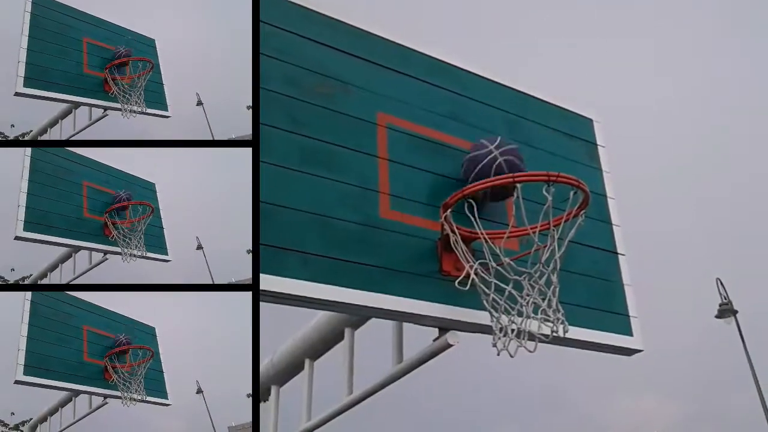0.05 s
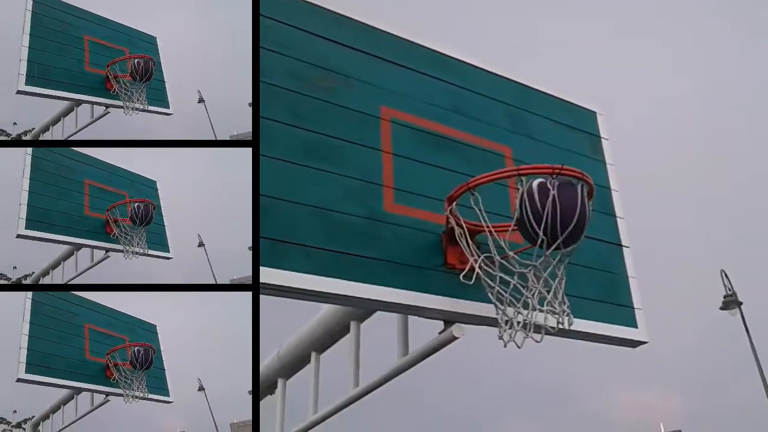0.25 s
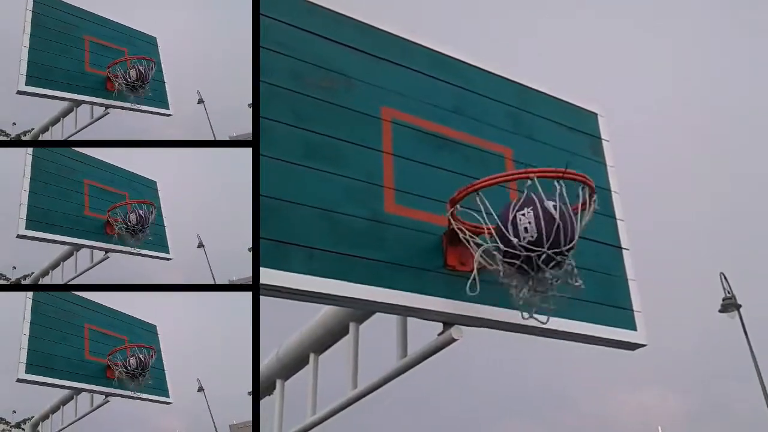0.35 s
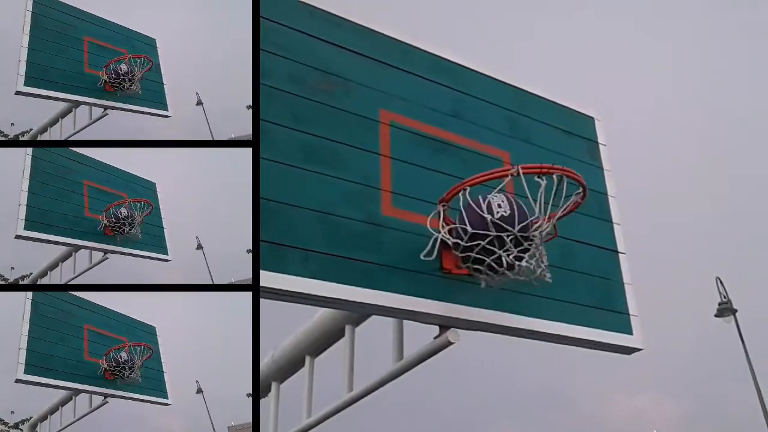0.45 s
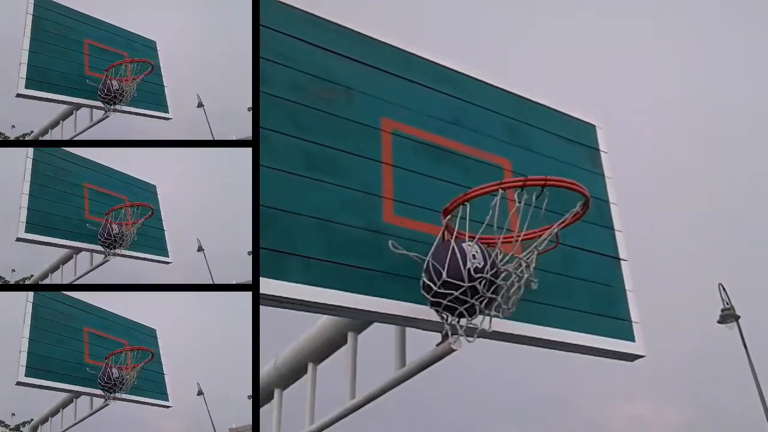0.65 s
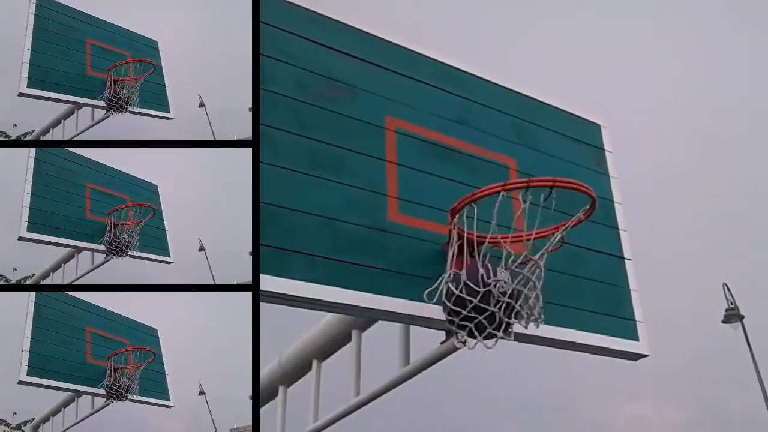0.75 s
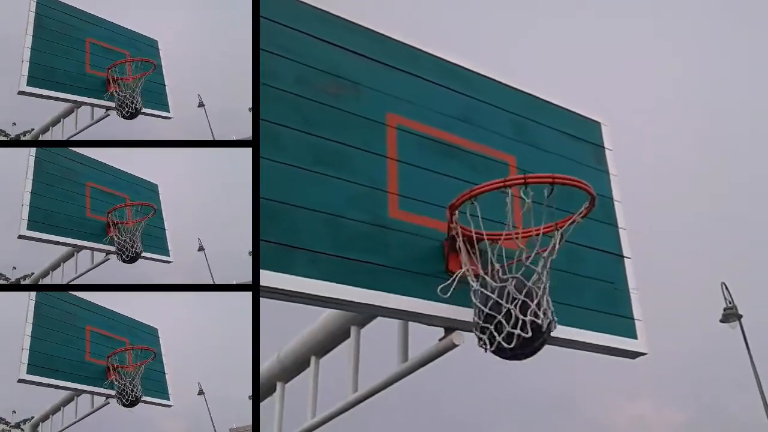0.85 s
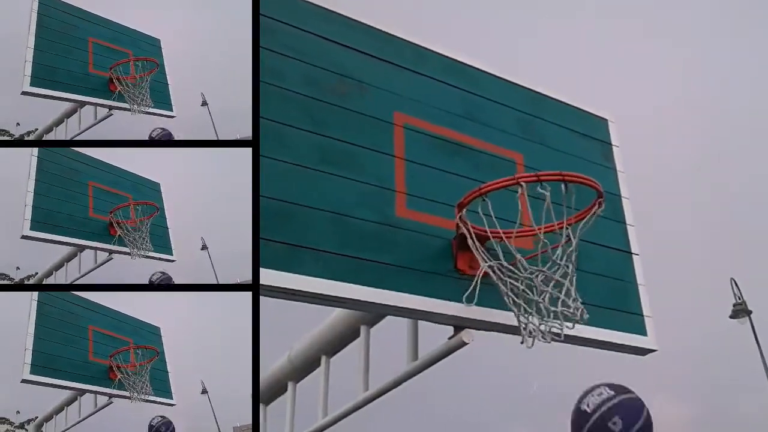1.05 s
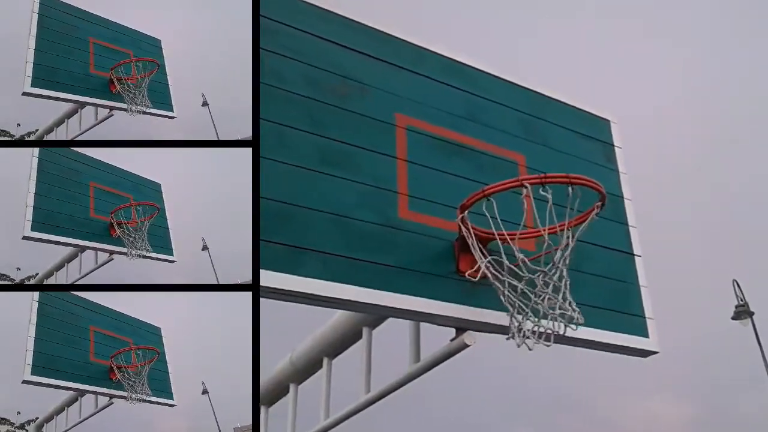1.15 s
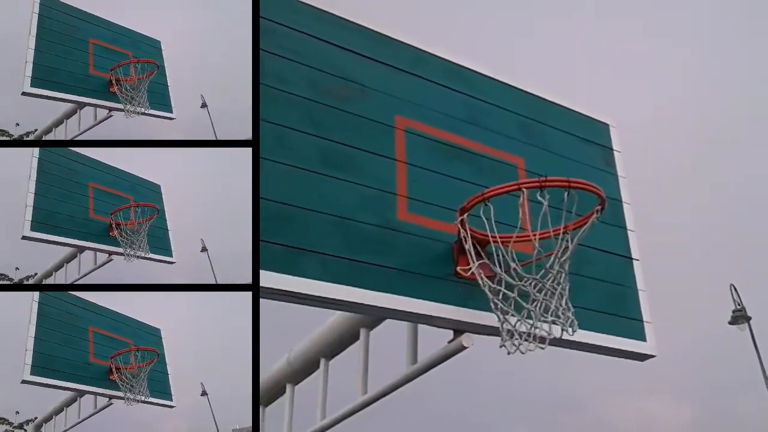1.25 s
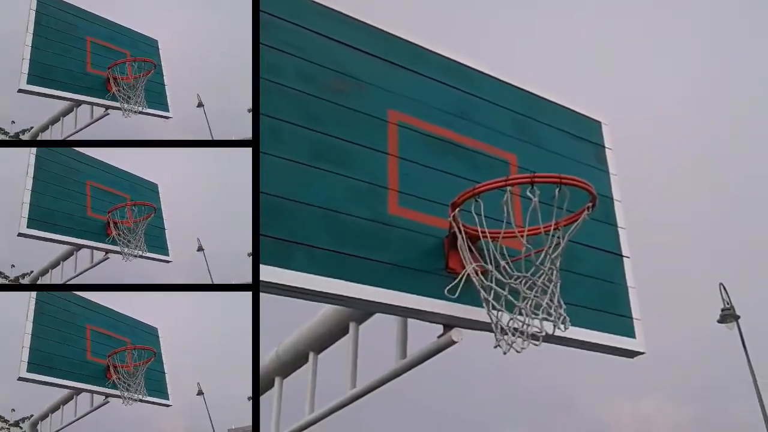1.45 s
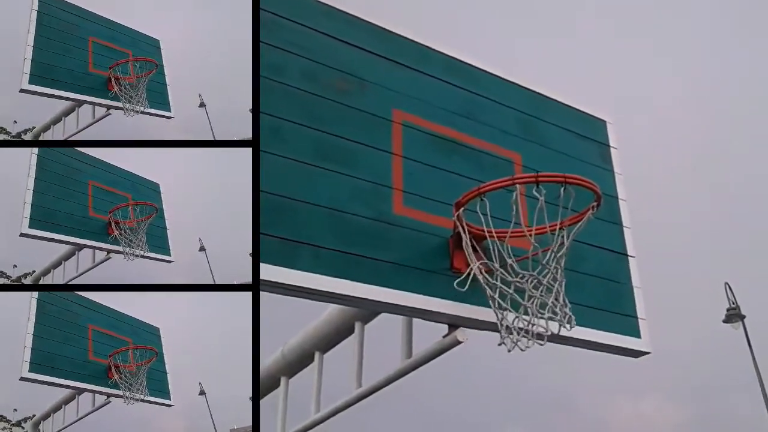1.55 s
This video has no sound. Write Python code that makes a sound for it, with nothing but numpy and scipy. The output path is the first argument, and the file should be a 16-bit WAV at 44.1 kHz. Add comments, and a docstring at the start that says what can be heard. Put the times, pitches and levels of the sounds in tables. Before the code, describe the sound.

Basketball hitting an outdoor hoop, shaking the backboard and swishing through the net with a knock.

```python
"""Basketball through an outdoor hoop

One microphone in quiet open air, with the camera's own thin hiss and buzz. The ball drops onto the rim
with a click and a thump, and the plank backboard shudders and hums. The ball brushes through the cord
net, which snaps taut with a sharp knock; the hoop squeaks as it settles, and a soft scuff follows."""
import sys
import numpy as np
from scipy import signal
from scipy.fft import rfft, irfft
from scipy.io import wavfile

SR = 44100
rng = np.random.default_rng(int(sys.argv[2]) if len(sys.argv) > 2 else 0)


def generate_wav(signal):
    """Clip the signal to [-1, 1] and save it as 16-bit WAV at the path in sys.argv[1]."""
    frames = np.transpose(np.atleast_2d(signal))
    scaled = np.clip(frames, -1, 1) * 32767
    pcm = np.round(scaled).astype(np.int16)
    wavfile.write(sys.argv[1], SR, pcm)


N = 70560  # 1.6 s


def undb(db):
    """Decibels to gain."""
    return 10 ** (np.asarray(db) / 20)


def clock():
    """Time of every sample in seconds."""
    return np.arange(N) / SR


def unit(x):
    """Scale to rms 1."""
    return x / np.sqrt(np.mean(x ** 2) + 1e-20)


def on_log(hz, points_hz, values):
    """Interpolate on a log-frequency axis."""
    return np.interp(np.log(np.maximum(hz, 1)), np.log(points_hz), values)


def colour(x, points):
    """Filter x by a curve of (f/Hz, level/dB) points, then scale to rms 1."""
    gain = undb(on_log(np.fft.rfftfreq(N, 1 / SR), *np.array(points).T))
    return unit(irfft(rfft(x) * gain, N))


def band(x, hz, width_hz):
    """Pass x through one resonance."""
    return signal.lfilter(*signal.iirpeak(hz, hz / width_hz, fs=SR), x)


def curve(points):
    """Gain along (t/s, level/dB) points."""
    return undb(np.interp(clock(), *np.array(points).T))


def swell(at, db, attack, release):
    """Smooth rise to a peak, then an exponential fall."""
    t = clock() - at
    return undb(db) * np.exp(np.where(t < 0, -(t / attack) ** 2, -t / release))


def fade(at, t60):
    """Sudden start and a 60 dB fall in t60 seconds."""
    t = clock() - at
    return (t >= 0) * np.exp(-np.log(1000) * np.maximum(t, 0) / t60)


def ring(at, modes):
    """Struck modes (f/Hz, level/dB, t60/s), each a decaying sine."""
    t = clock() - at
    return sum(undb(db) * fade(at, t60) * np.sin(2 * np.pi * hz * t) for hz, db, t60 in modes)


def dense_ring(at, table):
    """Countless close modes: quarter-octave noise bands, each with its own level and decay."""
    hz, db, t60 = np.array(table).T
    quarter = np.round(4 * np.log2(np.maximum(np.fft.rfftfreq(N, 1 / SR), 1)))
    noise, out = rfft(rng.standard_normal(N)), 0
    for k in range(22, 57):  # 45 Hz to 16 kHz
        centre = 2 ** (k / 4)
        if centre > hz[0] / 2:
            part = unit(irfft(noise * (quarter == k), N))
            out = out + part * undb(on_log(centre, hz, db)) * fade(at, on_log(centre, hz, t60))
    return out / 2  # four bands share each octave's power


def grains(per_s=4500, range_db=18):
    """Dense stick-slip clicks of uneven size."""
    fires = rng.random(N) < per_s / SR
    return fires * rng.choice([-1, 1], N) * undb(-range_db * rng.random(N))


def outdoor_air():
    """Quiet, low background noise of the place."""
    # spectrum of the air: f/Hz, relative level/dB
    spectrum = [(25, -12), (50, 5), (75, 0.5), (110, 1.5), (155, 10), (250, -3), (400, -10), (700, -14),
                (1500, -45.5), (3000, -19), (6000, -31.5), (16000, -61)]
    # its rise and fall: t/s, level/dB
    level = [(0, -61.5), (0.045, -66.5), (0.085, -68.5), (0.15, -55.5), (0.9, -53.5), (1.24, -63),
             (1.29, -62.5), (1.45, -67.5), (1.54, -61), (1.6, -66)]
    return curve(level) * colour(rng.standard_normal(N), spectrum)


def camera_hiss():
    """Thin, wavering self-noise of the camera."""
    # spectrum of the hiss: f/Hz, relative level/dB
    spectrum = [(1000, -4), (4000, -16), (7200, -9.5), (8200, 6), (9200, -2.5), (10600, -0.5),
                (12000, -16.5), (16000, -19)]
    # its rise and fall: t/s, level/dB
    level = [(0, -67), (0.045, -56.5), (0.068, -64), (0.098, -82), (0.115, -59.5), (0.88, -53.5),
             (0.92, -60.5), (1.24, -60), (1.28, -66), (1.6, -63.5)]
    return colour(rng.standard_normal(N), spectrum) * curve(level)


def camera_buzz(clock_hz=1000, stray_chance=0.31, stray_db=2, scatter_db=4.5):
    """Electrical ticks on a fast clock: two slots in five always fire, the others at random."""
    # spectrum of a tick: f/Hz, relative level/dB
    spectrum = [(1000, -36), (5000, -24), (7200, -14.5), (8300, -7), (9200, -0.5), (10400, -9.5),
                (11800, -17), (14000, -19.5), (16000, -26)]
    # rise and fall of the buzz: t/s, level/dB
    level = [(0.098, -69), (0.11, -56.5), (0.2, -51), (0.45, -48.5), (0.56, -52), (0.62, -49.5),
             (0.775, -48), (0.785, -71), (0.818, -73), (0.828, -48.5), (0.888, -48), (0.905, -96)]
    slots = np.arange(int(N / SR * clock_hz))
    steady = np.array([1, 0, 0, 0, -1])[slots % 5]
    stray = (rng.random(len(slots)) < stray_chance) * undb(stray_db)
    sizes = undb(scatter_db * rng.standard_normal(len(slots)))
    ticks = np.zeros(N)
    ticks[slots * SR // clock_hz] = np.where(steady != 0, steady, stray) * sizes
    return colour(ticks, spectrum) * curve(level)


def rim_hit(click_decay_s=0.0003):
    """The ball clicks and thumps on the rim twice in quick succession; the backboard rings on."""
    # contacts with the rim: t/s, thump gain/dB
    hits = [(0.22, -26), (0.2274, -22)]
    # click of each contact: level/dB, f/Hz
    clicks = [(-13, 7600), (-18.5, 2500)]
    # modes of ball and rim: f/Hz, relative level/dB, t60/s
    thump = [(129, -13.5, 0.17), (236, 0.5, 0.062), (480, -9.5, 0.071), (665, -14, 0.08),
             (1341.4, -14.5, 0.093)]
    # modes of backboard and frame: f/Hz, level/dB, t60/s
    board = [(74, -53, 2.0), (121.1, -35, 1.48), (143.9, -37.5, 1.9), (154.5, -45, 3.3), (178, -45.5, 0.37),
             (257.7, -39, 0.56), (393.4, -40, 0.28), (455, -50, 0.41), (840, -77, 0.59),
             (1044, -38.5, 0.27), (1090, -66, 0.29), (1295, -41.5, 0.35)]
    # dense ringing of the planks: f/Hz, level per octave/dB, t60/s
    planks = [(60.4, -64, 0.24), (119, -38.5, 0.9), (260, -37.5, 1), (540, -43.5, 1), (1080, -39.5, 0.41),
              (2260, -48, 0.29), (4700, -38.5, 0.18), (9700, -37, 0.084), (15200, -55, 0.025)]
    out, first = 0, hits[0][0]
    for (at, thump_db), (click_db, hz) in zip(hits, clicks):
        t = np.maximum(clock() - at, 0)
        click = -np.exp(-t / click_decay_s) * np.sin(2 * np.pi * hz * t)
        out = out + undb(thump_db) * ring(at, thump) + undb(click_db) * click
    return out + ring(first, board) + dense_ring(first, planks)


def hoop_squeaks(relative_width=0.06):
    """The swaying hoop squeaks and creaks in short bursts of narrow-band noise."""
    # squeaks: t/s, level/dB, attack/s, release/s, f/Hz
    squeaks = [(0.318, -61, 0.0089, 0.015, 2650), (0.33, -60.5, 0.022, 0.021, 3430),
               (0.794, -45, 0.003, 0.011, 5000), (0.85, -56.5, 0.0062, 0.027, 2670),
               (0.872, -56, 0.03, 0.018, 3330), (0.978, -58, 0.0095, 0.025, 434),
               (1.19, -66, 0.036, 0.032, 3540), (1.24, -69, 0.015, 0.026, 3460),
               (1.373, -70, 0.0045, 0.0073, 2720), (1.415, -67, 0.004, 0.0079, 2610)]
    out = 0
    for at, db, attack, release, hz in squeaks:
        width_hz = hz * relative_width
        tone = band(band(rng.standard_normal(N), hz, width_hz), hz, width_hz)
        out = out + unit(tone) * swell(at, db, attack, release)
    return out


def net_brush(board_hz=143.7, hook_hz=13796):
    """Cords slide over the ball; their pull rattles the hoop, heaves the board and rings a steel hook."""
    # cords sliding on the ball: t/s, level/dB, attack/s, release/s
    swishes = [(0.36, -43.5, 0.009, 0.014), (0.383, -31, 0.0026, 0.03), (0.396, -32.5, 0.0096, 0.021),
               (0.454, -42, 0.0085, 0.031), (0.525, -42.5, 0.0048, 0.0086), (0.6, -56.5, 0.12, 0.47),
               (0.653, -40, 0.002, 0.0082), (0.99, -55, 0.0048, 0.0063)]
    # spectrum of cord friction: f/Hz, relative level/dB
    cord = [(300, -6), (1000, -3), (2400, -17), (3700, -5.5), (5000, -5), (6200, -4.5), (7500, -7),
            (8600, -5), (10000, -13), (13000, -17.5), (16000, -28)]
    # resonances of the hoop: f/Hz, width/Hz, relative level/dB
    hoop_modes = [(207, 25, 6.5), (286, 59, 5), (414.4, 68, 8.5), (557, 80, 5), (777, 70, 7), (924, 30, 4),
                  (1047, 29, -7), (1263, 44, 0.5), (1770, 40, -41)]
    # tugs that rattle the hoop: t/s, level/dB, attack/s, release/s
    tugs = [(0.373, -39.5, 0.017, 0.021), (0.435, -38, 0.036, 0.042), (0.519, -46.5, 0.014, 0.1),
            (0.72, -50, 0.058, 0.064), (0.8, -56, 0.038, 0.033), (1.21, -70.5, 0.021, 0.01)]
    # the net's load swinging the board's main mode: t/s, level/dB, attack/s, release/s
    heaves = [(0.396, -27.5, 0.028, 0.0094), (0.467, -31.5, 0.032, 0.03), (0.598, -32, 0.0055, 0.0071),
              (0.868, -41.5, 0.021, 0.0059), (1.1, -53.5, 0.23, 0.069)]
    slide = colour(grains(), cord) * np.sqrt(sum(swell(*row) ** 2 for row in swishes))
    pull = grains()
    hoop = unit(sum(undb(db) * band(pull, hz, width) for hz, width, db in hoop_modes))
    rattle = hoop * np.sqrt(sum(swell(*row) ** 2 for row in tugs))
    heave = sum(swell(at, *shape) * np.sin(2 * np.pi * board_hz * (clock() - at)) for at, *shape in heaves)
    hook = ring(at=0.388, modes=[(hook_hz, -42.5, 0.35)])
    return slide + rattle + heave + hook


def net_snap():
    """The net snaps taut on the ball: a quick run of cracks and one ringing knock."""
    # cracks: t/s, gain/dB
    snaps = [(0.6592, 2), (0.6627, -4), (0.6665, -2)]
    # modes the snap rings: f/Hz, level/dB, t60/s
    knock = [(276, -42, 0.43), (292.8, -42.5, 0.33), (546, -43.5, 0.25), (836, -36.5, 0.12),
             (1045, -55, 0.094), (1106, -40, 0.11), (1352, -44.5, 0.075), (1440, -36, 0.12),
             (1503, -27, 0.052), (1790, -30, 0.037), (1933, -39.5, 0.12), (2675, -34, 0.083),
             (3700, -42.5, 0.12), (5340, -35, 0.02)]
    # dense ringing of one crack: f/Hz, relative level per octave/dB, t60/s
    crack = [(645, -75, 0.08), (850, -36.5, 0.17), (1570, -40.5, 0.11), (2180, -53, 0.27),
             (2860, -37.5, 0.099), (3550, -30.5, 0.055), (4080, -45, 0.083), (5230, -28, 0.054),
             (7100, -38, 0.034), (8300, -28, 0.015), (12000, -43, 0.029), (15500, -52, 0.02)]
    return ring(snaps[0][0], knock) + sum(undb(db) * dense_ring(at, crack) for at, db in snaps)


def scuff():
    """Soft stick-slip scuffing below the hoop."""
    # spectrum of the friction: f/Hz, relative level/dB
    spectrum = [(60, 13), (140, 7), (280, 6), (450, -6), (1200, -5), (2200, -2), (3200, 6.5), (4500, -6),
                (9000, 1.5), (15000, -25)]
    # scuffs: t/s, level/dB, attack/s, release/s
    scuffs = [(1.39, -67.5, 0.061, 0.096), (1.513, -53.5, 0.04, 0.02)]
    return colour(grains(), spectrum) * sum(swell(*row) for row in scuffs)


def scene():
    """Hoop, net and background at one microphone."""
    shot = rim_hit() + net_brush() + net_snap() + hoop_squeaks() + scuff()
    return (shot + outdoor_air() + camera_buzz() + camera_hiss())[None]


def record(dry):
    """The recorder cuts the bass below 69 Hz and the top above 15.9 kHz."""
    low_cut = signal.butter(4, 69, "high", fs=SR, output="sos")
    high_cut = signal.ellip(10, .2, 80, 15900, fs=SR, output="sos")
    return signal.sosfilt(high_cut, signal.sosfilt(low_cut, dry))


dry = scene()
out = record(dry)
generate_wav(out)
```